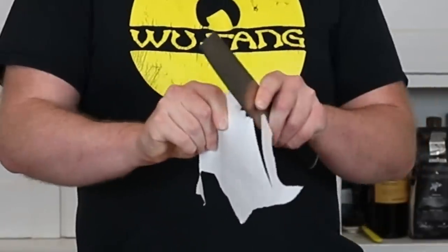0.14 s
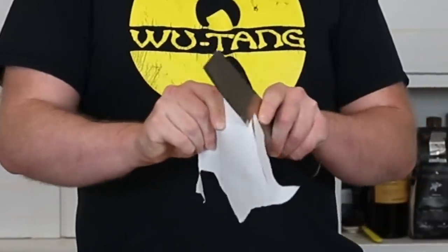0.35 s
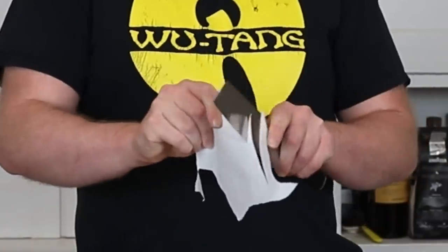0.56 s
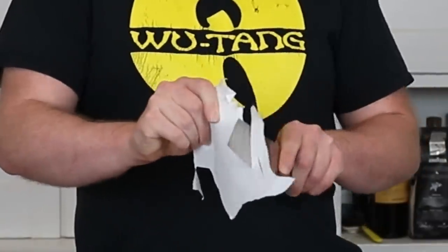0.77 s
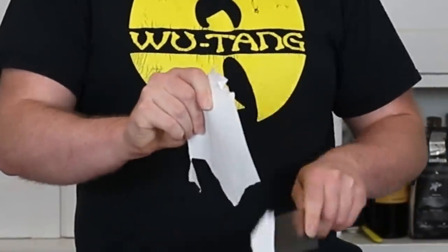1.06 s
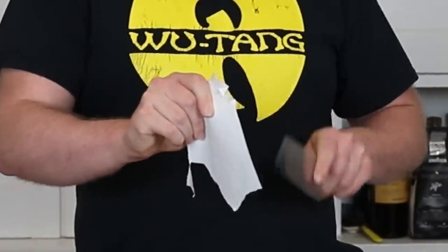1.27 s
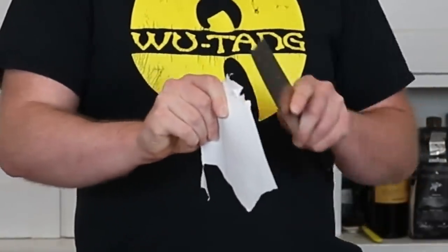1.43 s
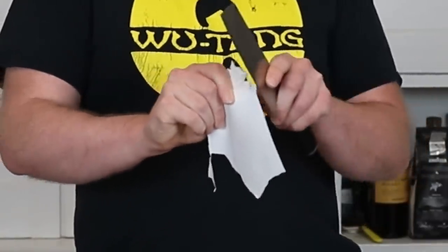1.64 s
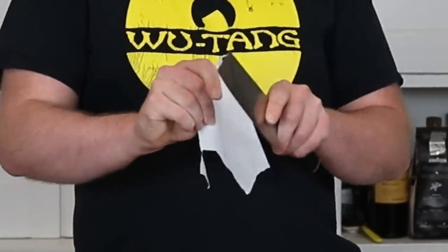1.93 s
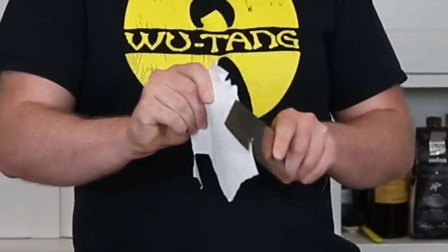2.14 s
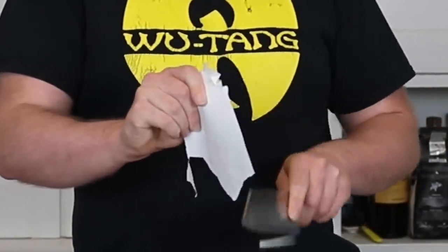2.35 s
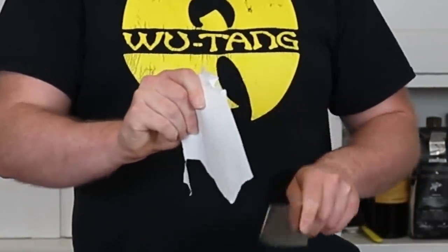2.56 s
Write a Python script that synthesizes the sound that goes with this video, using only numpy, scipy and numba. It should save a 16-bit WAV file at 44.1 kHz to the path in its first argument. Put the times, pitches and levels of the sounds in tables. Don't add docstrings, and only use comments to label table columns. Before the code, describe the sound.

A knife cuts hand-held paper: stuttering, crackling little tears speed up into a bright ripping slice, then a pause with light paper flicks, and a second, duller slice that brightens at its end. Close microphone, small quiet kitchen.

```python
import sys
import numpy as np
from scipy import signal
from scipy.fft import rfft, irfft
from scipy.io import wavfile
from scipy.ndimage import uniform_filter1d
from numba import njit

SR = 44100
rng = np.random.default_rng(int(sys.argv[2]) if len(sys.argv) > 2 else 0)


def convert_level_to_amplitude(level_db):
    exponent = np.asarray(level_db, float) / 20
    return 10 ** exponent


def inscribe(sig):
    pcm = np.round(np.clip(np.atleast_2d(sig).T, -1, 1) * 32767)
    wavfile.write(sys.argv[1], SR, pcm.astype(np.int16))


N = 119070

SWAY_DB = 1.2


@njit
def sweep(x, hz, width):
    y, band, low = np.empty(len(x)), 0., 0.
    for i in range(len(x)):
        g, damping = np.tan(np.pi * hz[i] / SR), width / hz[i]
        v = (band + g * (x[i] - low)) / (1 + g * (g + damping))
        band, low, y[i] = 2 * v - band, low + 2 * g * v, damping * v
    return y


def svf(x, hz, width):
    return sweep(x, hz + np.zeros(len(x)), float(width))


def unit(x):
    return x / np.sqrt(np.mean(x ** 2))


def walk(rate):
    hold = int(SR / rate)
    steps = np.repeat(rng.standard_normal(N // 50)[:N // hold + 1], hold)
    return unit(uniform_filter1d(uniform_filter1d(steps, hold), hold)[:N])


def fade(t, start, t60, rise=0.0011):
    since = np.maximum(t - start, 0)
    return (1 - np.exp(-since / rise)) * convert_level_to_amplitude(-60 * since / max(t60, .004))


def snaps():
    snaps_per_s, spread_db = 8000, 2.6
    on, sign, size = rng.random((3, N))
    return unit((on < snaps_per_s / SR) * (sign - .5) * convert_level_to_amplitude(-spread_db * np.log(size + .015)))


def cutting(t):
    # (time [s], pressure [dB], brightness [dB/octave], focus on the middle [dB/octave^2])
    bite = [
        (.04, -67, -17, -3),
        (.05, -54, -4, -1.8),
        (.09, -48.5, -2, -0.8),
        (.12, -55, -5.5, -1.4),
        (.18, -62, -5.5, -0.5),
        (.23, -48.5, -6, 0),
        (.3, -44, -0.5, -0.5),
        (.355, -41, -3, -1.1),
        (.39, -68, -1, 3),
    ]
    first_cut = [
        (.365, -57, 0, 2.5),
        (0.379, -41.5, 0.61, -1.5),
        (0.441, -29, 2.4, 0.5),
        (.5, -27, 1.3, 1.2),
        (.58, -24.5, -0.91, 1.5),
        (.7, -28.5, -0.23, 1),
        (.88, -34, -0.51, 0.5),
        (1.016, -32, 1.3, -0.1),
        (1.028, -40, -2, -2),
    ]
    second_cut = [
        (1.859, -63.5, 0, 0.037),
        (1.875, -49.5, -3.5, 0.34),
        (1.932, -39, -3.5, 0.12),
        (2.06, -37.5, -3, 0),
        (2.16, -36.5, -1.8, 0.61),
        (2.224, -30, 0, 0.73),
        (2.3, -26, 1, 0.98),
        (2.346, -28, 1, 0.052),
        (2.362, -60, 7, 0),
    ]
    # (time [s], peak level [dB], t60 [s], brightness [dB/octave])
    jerks = [(0.05, -29.5, 0.12, 1.9), (0.068, -42, 0.032, -8), (0.097, -28.5, 0.014, 3.5),
             (0.135, -31.5, 0.047, 13), (0.183, -37, 0.011, 3), (0.192, -24.5, 0.075, 0.7),
             (0.2077, -22, 0.014, 1.5), (0.229, -18.5, 0.02, 2), (0.2408, -21.5, 0.02, 6.5),
             (0.2466, -23, 0.031, 10), (0.2557, -19, 0.014, 9), (0.2742, -20, 0.022, 0),
             (0.2804, -21, 0.068, 11), (0.285, -21.5, 0.042, -5.5), (0.289, -18, 0.015, 6.5),
             (0.3062, -15, 0.035, 4), (0.311, -17, 0.036, 8.5), (0.3145, -11.5, 0.027, 4),
             (0.317, -18, 0.032, 6.5), (0.326, -13, 0.021, 5.5), (0.331, -16, 0.025, 3),
             (0.334, -25, 0.035, 0), (0.3388, -10, 0.051, 1.5), (0.3435, -24, 0.05, 0.5),
             (0.3582, -8.5, 0.04, 2.5), (0.36, -17, 0.032, 4), (0.364, -12, 0.11, 1.5),
             (0.468, -17.5, 0.044, 4.5), (0.49, -12, 0.04, -1), (0.503, -12, 0.02, 1),
             (0.584, -18, 0.033, 4), (0.599, -18, 0.04, 5), (0.788, -13.5, 0.14, -3), (0.931, -17, 0.2, -5),
             (1.001, -12, 0.056, -1), (1.1771, -32.5, 0.027, 4), (1.871, -34.5, 0.041, -0.5),
             (2.244, -10, 0.051, -4), (2.263, -11, 0.043, 0), (2.296, -26, 0.03, 4),
             (2.337, -14.5, 0.018, -3)]
    # (frequency [Hz], width [Hz], level [dB])
    modes = [(352, 176, -18), (700, 334, -9), (1200, 256, -8), (1573, 286, -5), (2234, 443, -7),
             (2550, 404, -2), (3120, 440, -4.5), (4300, 525, -5), (5125, 700, -6.5), (6500, 510, -11.5),
             (8530, 1640, -8), (9600, 1500, -13), (12200, 4000, -15), (14260, 2000, -23)]
    most_tilt_db, least_focus_db, slip_focus_db = 4, -1.2, .5
    first_snap_db, flutter_db, patchy_db = 5, 1.3, 1.5
    common_bend, own_bend = .035, .02
    fine_t60_s, fine_db = .02, -13

    fibres = snaps()
    flutter = convert_level_to_amplitude(flutter_db * walk(110))
    layers = []
    for stroke in (bite, first_cut, second_cut):
        s, db, tilt, focus = np.array(stroke).T
        pressure = convert_level_to_amplitude(np.interp(t, s, db, left=-140, right=-140)) * flutter
        tilt = np.interp(t, s, np.clip(tilt, -most_tilt_db, most_tilt_db))
        focus = np.interp(t, s, np.maximum(focus, least_focus_db))
        layers.append((pressure, tilt, focus))
    for s, db, t60, tilt in jerks:
        first_snap = convert_level_to_amplitude(first_snap_db) * fade(t, s, 0.0047, rise=0.00028)
        tear = convert_level_to_amplitude(db - 13) * (fade(t, s, t60) + first_snap)
        layers.append((tear, np.clip(tilt, -most_tilt_db, most_tilt_db), slip_focus_db))

    out = 0
    bend = common_bend * walk(4.98)
    total = np.sqrt(sum(convert_level_to_amplitude(2 * db) for _, _, db in modes))
    for k, (hz, width, db) in enumerate(modes):
        octave = np.log2(hz / 2500)
        power = sum((env * convert_level_to_amplitude(tilt * octave - focus * octave ** 2)) ** 2 for env, tilt, focus in layers)
        drive = np.sqrt(power) * convert_level_to_amplitude(patchy_db * walk(34.71))
        centre = hz * (1 + bend + own_bend * walk(7.82))

        def ring(x):
            return svf(svf(x, centre, 1.74 * width), centre, 1.74 * width)

        out = out + (-1) ** k * convert_level_to_amplitude(db) / total * ring(fibres * drive) / ring(fibres).std()
    fine = rng.standard_normal(SR // 10) * fade(t[:SR // 10], 0, fine_t60_s)
    fine = fine / np.sqrt(np.sum(fine ** 2))
    return out + convert_level_to_amplitude(fine_db) * signal.fftconvolve(out, fine)[:N]


def flicks(t):
    # (time [s], peak level [dB], pitch [Hz], t60 [s])
    flick_events = [(.1984, -28, 3220, 0.0094), (.199, -26.5, 1260, 0.049), (1.082, -23, 1530, 0.055),
                    (1.084, -38, 700, 0.05), (1.246, -51.5, 700, 0.059), (1.247, -51.5, 3340, 0.018),
                    (1.2942, -33, 6840, 0.01), (1.3005, -38, 7100, 0.0044), (1.3033, -35, 6850, 0.0079),
                    (1.318, -51, 5500, 0.021), (1.3235, -42, 7500, 0.034), (1.327, -41.5, 4900, 0.053),
                    (1.358, -52, 8900, 0.02), (1.3657, -46, 6900, 0.035), (1.755, -50, 1960, 0.01),
                    (1.276, -52, 4500, 0.02), (1.3657, -49, 2940, 0.017), (1.3657, -54, 12600, .015),
                    (1.2942, -50, 10800, 0.014), (1.838, -60, 500, 0.022), (2.012, -21, 1760, 0.044),
                    (2.172, -20.5, 2070, 0.051), (2.347, -17, 1200, 0.06), (2.419, -32, 3030, 0.039),
                    (2.425, -28, 1200, 0.075), (2.4325, -19, 2940, 0.0086), (2.433, -20, 2000, 0.032),
                    (2.661, -59, 6500, 0.018)]
    click_gain, body_gain, flap_gain = 1.2, 2.2, 2.2
    flap_below_hz, body_span = 4000, 1.5
    out, noise, size = np.zeros(N), rng.standard_normal(N), int(.15 * SR)
    for s, db, hz, t60 in flick_events:
        at = slice(int(s * SR), int(s * SR) + size)
        click = fade(t[at], s, 0.0051, rise=0.00017) * np.sin(2 * np.pi * hz * (t[at] - s))
        crack = noise[at] * fade(t[at], s, t60, rise=0.00017) + click_gain * click
        body = crack
        for _ in range(3):
            body = svf(body, hz, body_span * hz)
        flap = svf(svf(crack, hz / 3, hz / 2), hz / 3, hz / 2)
        sound = svf(svf(crack, hz, .6 * hz), hz, .6 * hz)
        if hz < flap_below_hz:
            sound = sound + body_gain * body + flap_gain * flap
        out[at] += convert_level_to_amplitude(db) * sound / np.abs(sound).max()
    return out


def rustles(t):
    # (start [s], length [s], level [dB], centre [Hz], width [Hz])
    swells = [(0.433, .11, -34.5, 5900, 1800), (0.857, .17, -49, 13000, 3000),
              (1.095, 0.17, -64, 7800, 7000), (1.87, 0.16, -66.5, 8300, 1500),
              (2.1, 0.13, -34.5, 2800, 600), (2.266, 0.1, -35, 5100, 1000), (0.978, 0.11, -46.5, 460, 520),
              (1.27, 0.15, -63, 6700, 2500), (1.366, 0.37, -66, 630, 700), (1.398, 0.35, -73, 2050, 406),
              (1.384, 0.32, -70.5, 3880, 896), (1.92, 0.46, -54.5, 275, 296),
              (2.249, 0.1, -40.5, 12200, 1500), (2.344, 0.15, -49.5, 760, 910),
              (2.426, 0.15, -55, 2000, 254)]
    out = 0
    for s, length, db, hz, width in swells:
        arch = np.sin(np.pi * np.clip((t - s) / length, 0, 1))
        swell = arch * convert_level_to_amplitude(db + SWAY_DB * walk(40.8))
        out = out + swell * unit(svf(rng.standard_normal(N), 1. * hz, 1. * width))
    return out


def blade(t):
    # (frequency [Hz], level [dB], t60 [s])
    partials = [(2035, -50, .33), (2132, -53, .33), (1900, -55, .3), (7531, -54, .5)]
    free_s = 2.37
    return sum(convert_level_to_amplitude(db) * fade(t, free_s, t60, rise=0.0072) * np.sin(2 * np.pi * hz * t)
               for hz, db, t60 in partials)


def room(x):
    t60_s, treble_t60_s, room_db = .4, .27, -8.5
    t, noise = np.arange(SR // 2) / SR, rng.standard_normal(SR // 2)
    low = signal.lfilter(*signal.butter(2, 5000, fs=SR), noise)
    tail = low * fade(t, 0.0047, t60_s, rise=0.014)
    tail = tail + (noise - low) * fade(t, 0.012, treble_t60_s, rise=0.0021)
    return convert_level_to_amplitude(room_db) * signal.fftconvolve(x, tail / np.sqrt(np.sum(tail ** 2)))[:N]


def kitchen():
    # (frequency [Hz], spectral level [dB per Hz])
    spectrum = [(18, -49), (30, -15.5), (105, -6.5), (190, -3.5), (800, -16), (1400, -22), (7600, -28),
                (16000, -35.5)]
    background_db = -63
    hz, db = np.array(spectrum).T
    f = np.arange(N // 2 + 1) * SR / N + 1
    shape = convert_level_to_amplitude(np.interp(np.log(f), np.log(hz), db))
    hum = unit(irfft(rfft(rng.standard_normal(N)) * shape, N))
    return convert_level_to_amplitude(background_db + SWAY_DB * walk(7.7)) * hum


def scene():
    t = np.arange(N) / SR
    near = cutting(t) + flicks(t) + rustles(t)
    return (near + room(near) + blade(t) + kitchen())[None]


def thin_treble(x):
    # (time [s], thinned above [Hz])
    thin_frames = [(.553, 7000), (.596, 7500), (1.045, 6500), (1.49, 4500), (1.662, 3500), (1.812, 2600),
                   (1.858, 3500), (1.896, 6000), (1.96, 5800), (2.003, 6000), (2.324, 6000)]
    frame_s, kept_share = .03, .07
    y, size = x.copy(), int(frame_s * SR)
    window = np.sin(np.pi * np.arange(size) / size)
    f = np.arange(size // 2 + 1) * SR / size
    for s, hz in thin_frames:
        start = int(s * SR) - size // 2
        at = slice(start, start + size)
        lines = rfft(x[0, at] * window)
        strength = np.abs(lines) * np.sqrt(f)
        weak = (f > hz) & (strength < np.quantile(strength[f > hz], 1 - kept_share))
        y[0, at] -= window * irfft(lines * weak, size)
    return y


def top_cut(x):
    return signal.sosfilt(signal.butter(12, 16490, fs=SR, output="sos"), x)


def record(dry):
    top_hz = 16000
    low_pass = signal.ellip(8, .2, 60, top_hz, fs=SR, output="sos")
    mix = thin_treble(signal.sosfilt(low_pass, dry))
    return top_cut(mix)


dry = scene()
out = record(dry)
inscribe(out)
```